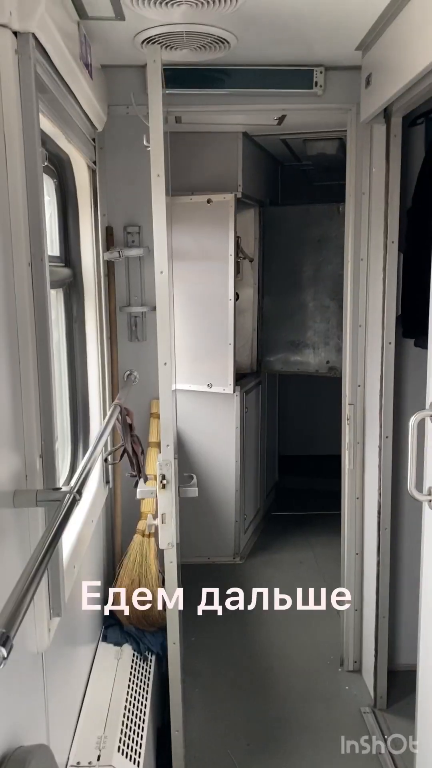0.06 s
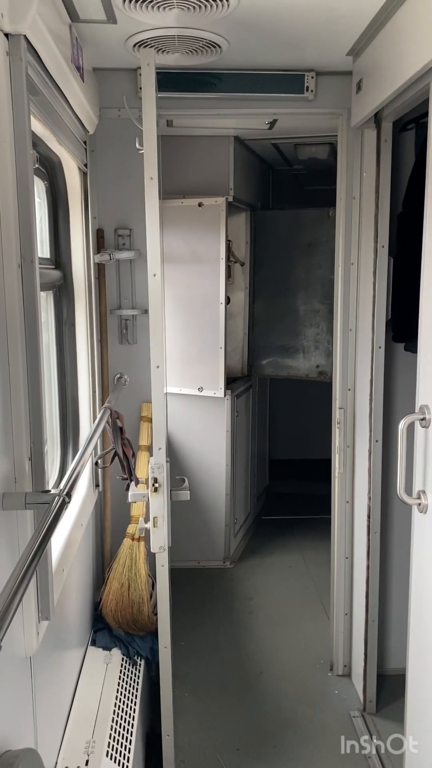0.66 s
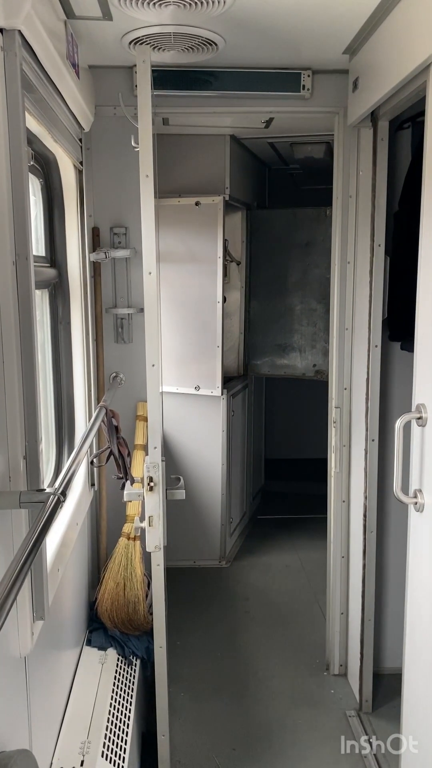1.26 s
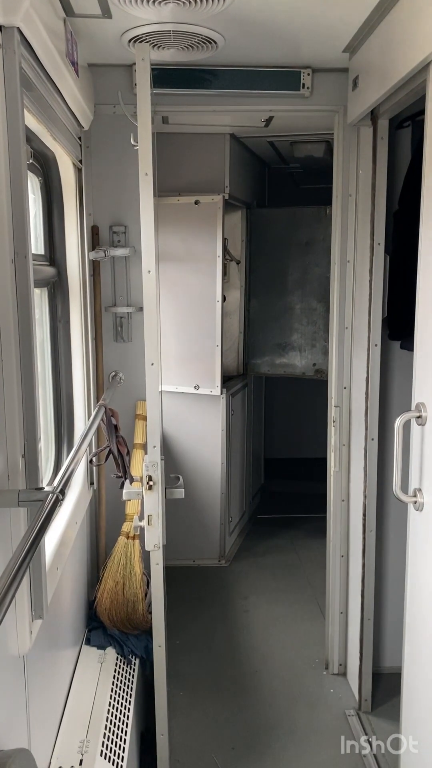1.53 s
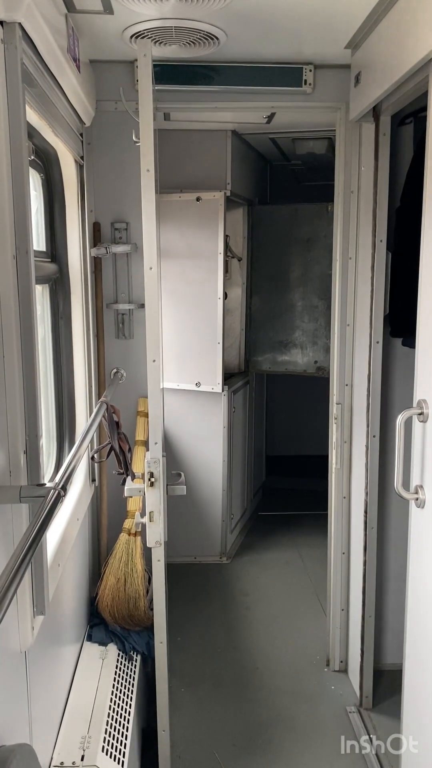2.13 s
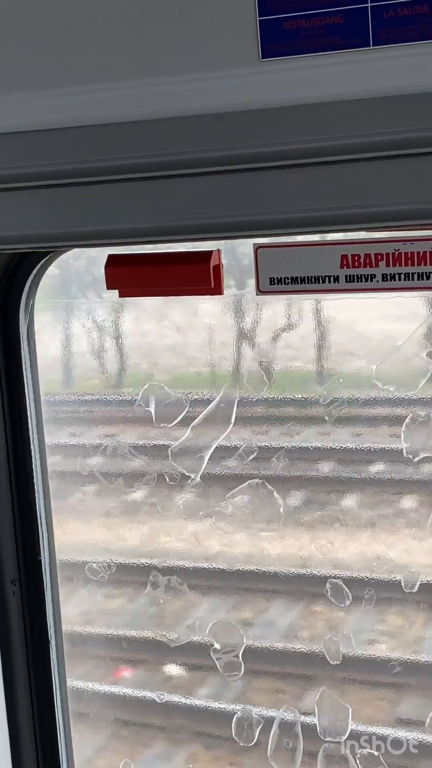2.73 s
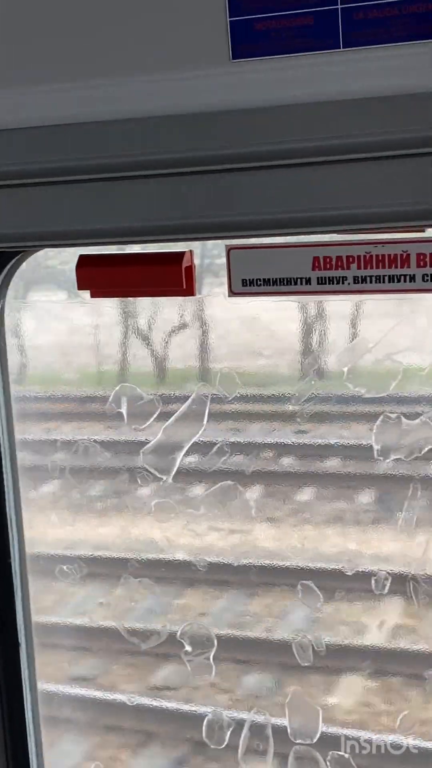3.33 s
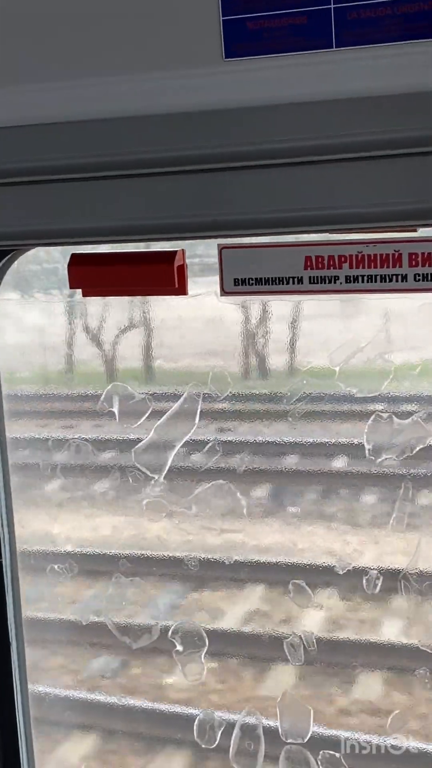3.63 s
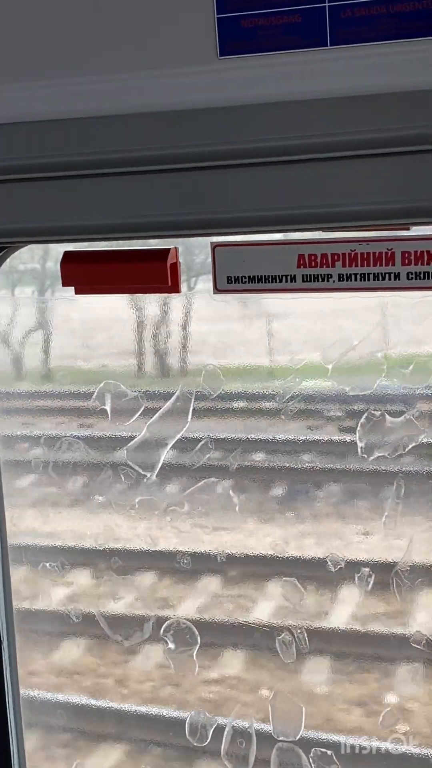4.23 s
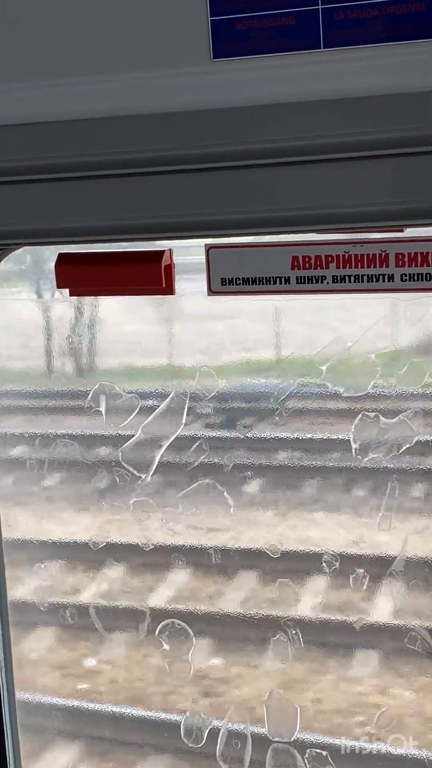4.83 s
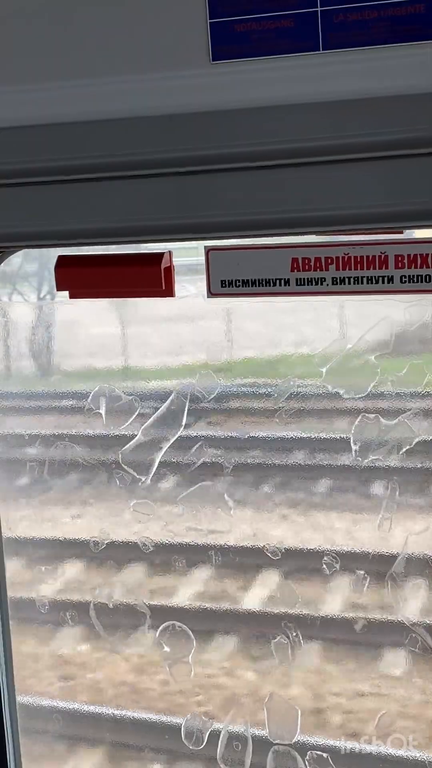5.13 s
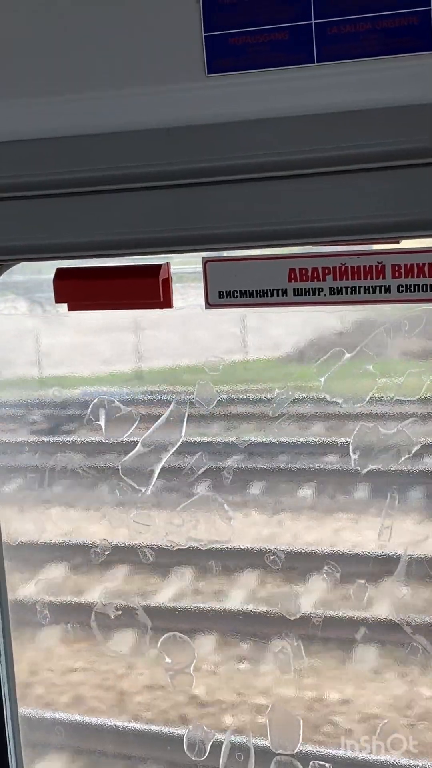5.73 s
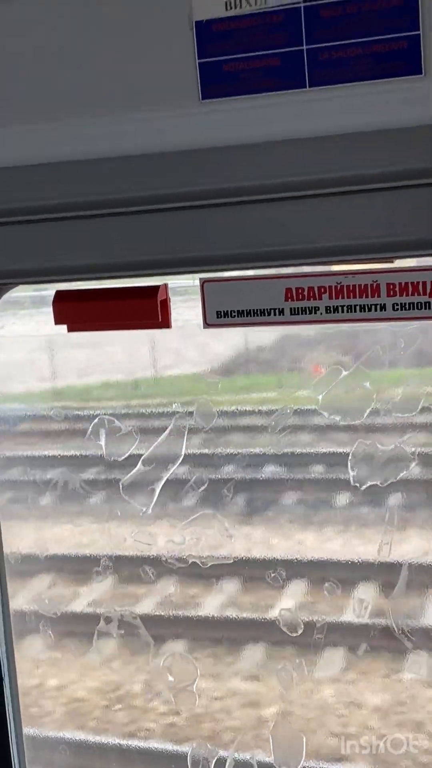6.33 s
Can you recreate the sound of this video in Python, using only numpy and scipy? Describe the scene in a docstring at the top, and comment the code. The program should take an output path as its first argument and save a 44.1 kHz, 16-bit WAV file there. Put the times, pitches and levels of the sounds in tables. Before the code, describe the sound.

Heard from inside a passenger train, in the corridor above the wheels, the carriage gives a loud, deep rumble with a wheel roar and a faint electrical hum. Small metal fittings clink and loose trim rattles. After about two seconds the sound cuts abruptly to a quieter, muffled rumble at a window seat, with a low steady hum, scattered clacks and knocks, and faint cloth rustling near the microphone.

```python
"""Railway carriage, corridor and window seat

A stereo microphone rides at the end of the corridor, over the bogie, then abruptly at a quieter seat.
Rough rails make the car body boom and the wheels roar; electrical machines hum, and a grazing wheel
sings faintly, very high up. Jolted fittings clink, clack and knock, shaken panels drone, trim rattles,
and cloth rustles close to the microphone."""
import sys
import numpy as np
from scipy.fft import rfft, irfft, next_fast_len
from scipy.io import wavfile
from scipy.ndimage import uniform_filter1d, map_coordinates

SR = 44100
rng = np.random.default_rng(int(sys.argv[2]) if len(sys.argv) > 2 else 0)


def to_wav(sig):
    """Store sig (one row per channel, or 1-D mono) as 16-bit WAV at the path in sys.argv[1].

    Samples outside -1..1 are clipped; the rate is SR.
    """
    pcm = np.clip(np.atleast_2d(sig), -1, 1) * 32767
    pcm = np.round(pcm).astype(np.int16)
    wavfile.write(sys.argv[1], SR, pcm.T)  # frames by channels


N = 280467
TIME = np.arange(N) / SR


def amp(db):
    """Decibels to gain."""
    return 10 ** (np.asarray(db) / 20)


def unit(x):
    """Scale to rms 1."""
    return x / np.sqrt(np.mean(x ** 2) + 1e-20)


def along(points, hz):
    """Read (f/Hz, value) points on a log frequency axis."""
    f, v = np.transpose(points)
    return np.interp(np.log(hz + 1), np.log(f + 1), v)


def wobble(rate, count=N):
    """A smooth random curve of count samples, rate knots a second."""
    return map_coordinates(rng.standard_normal(int(count * rate / SR) + 4), [TIME[:count] * rate])


def tone(hz):
    """A sine that follows one frequency per sample."""
    return np.sin(2 * np.pi * np.cumsum(hz) / SR)


def filtered(x, response):
    """Filter x by a function of frequency."""
    m = next_fast_len(x.shape[-1] + SR // 4)
    return irfft(rfft(x, m) * response(np.fft.rfftfreq(m, 1 / SR)), m)[..., :x.shape[-1]]


def resonances(modes, f):
    """The response of (f/Hz, width/Hz, level/dB) modes of alternating sign."""
    return sum((-1) ** k * amp(db) * 1j * f * width / (hz * hz - f * f + 1j * f * width)
               for k, (hz, width, db) in enumerate(modes))


def swells(rows, attack_s, release_db_per_s):
    """The joint gain of (t/s, length/s, level/dB) events that swell, hold and die away."""
    power = 0
    for s, length, db in rows:
        attack = np.clip((TIME - s) / attack_s, 0, 1)
        fall_db = release_db_per_s * np.maximum(TIME - s - length, 0)
        power += (attack * amp(db - fall_db)) ** 2
    return np.sqrt(power)


def sustained(x, span_s):
    """Even out the swells slower than span_s, keeping the fast beating."""
    power = np.abs(uniform_filter1d(np.mean(x ** 2, axis=0), int(span_s * SR) + 1))
    return unit(x / np.sqrt(uniform_filter1d(power, SR // 20) + 1e-6))


# stereo width at the microphone: f/Hz, side minus mid/dB
STEREO_WIDTH = [(70, -43.5), (200, -27.5), (350, -17.5), (650, -6.5), (1400, -11.5), (3000, -9),
                (10000, -24)]
def at_microphone(pair, response):
    """Two noises, filtered, become left and right at rms 1: long waves reach both ports alike."""
    coloured = filtered(pair, response)
    mid, side = filtered(coloured, lambda hz: np.array([np.ones_like(hz), amp(along(STEREO_WIDTH, hz))]))
    return unit(np.array([mid + side, mid - side]))


def rush(spectrum, grain_db=0):
    """Stereo noise, ending an octave above its last point; grain_db clumps it into millisecond grains."""
    force = rng.standard_normal((2, N)) * amp(grain_db * wobble(700))
    return at_microphone(force, lambda hz: amp(along(spectrum, hz)) * (hz < 2 * spectrum[-1][0]))


# a wheel below the corridor: centre t/s, half length/s, f/Hz, level/dB
WHEEL_NOTES = [(0.363, 0.033, 14670, -61), (0.705, .025, 14900, -71), (2.197, 0.11, 14800, -65),
               (2.263, 0.067, 14170, -62)]
def wheel_singing(wander_hz=110, flutter_db=4):
    """A flange grazes the rail and a high wheel mode swells for a moment, catching and slipping."""
    out = np.zeros(N)
    for s, half_length, hz, db in WHEEL_NOTES:
        note = unit(tone(hz + wander_hz * wobble(600)) * amp(flutter_db * wobble(90)))
        out += amp(db) * np.exp(-((TIME - s) / half_length) ** 2) * note
    return out


# cloth close to the microphone, spectrum before the tilt: f/Hz, relative level/dB
CLOTH_SPECTRUM = [(600, -16), (1800, 1.5), (5500, 1.5), (8000, -5.5), (11500, -2.5), (15500, -6)]
# its strokes: t/s, length/s, level/dB
CLOTH_STROKES = [(-0.06, .42, -65.5), (0.49, 0.088, -68), (0.955, 0.09, -61), (1.305, 0.21, -67.5),
                 (1.69, 0.24, -68), (2.08, 0.17, -56.5), (2.29, .1, -62), (2.46, .08, -74), (2.97, .2, -80),
                 (3.345, 0.11, -64), (3.43, 0.13, -59.5), (3.97, 0.071, -66), (4.18, 0.3, -65),
                 (4.63, 0.11, -66.5), (5.05, .08, -71.5), (5.13, 0.074, -65), (5.29, 0.058, -67),
                 (5.63, .11, -75.5), (5.95, 0.48, -68)]
def cloth_rustle(rest_db, grain_db, tilt_db_per_octave, uneven_db):
    """Cloth rustles in strokes of dense tiny grains; the tilt sets its brightness."""
    gain = np.hypot(amp(rest_db), swells(CLOTH_STROKES, attack_s=0.055, release_db_per_s=116))
    colour = [(hz, db + tilt_db_per_octave * np.log2(hz)) for hz, db in CLOTH_SPECTRUM]
    return gain * amp(uneven_db * wobble(22)) * rush(colour, grain_db)


# fits of rattling in the loose trim: t/s, length/s, level/dB
RATTLE_FITS = [(-0.02, 0.037, -53), (.84, 0.11, -61), (.99, 0.056, -56), (1.275, 0.019, -62),
               (1.33, 0.16, -57.5), (1.64, .28, -61), (2.12, 0.16, -58.5), (2.5, 0.32, -72.5),
               (2.76, 0.41, -74), (3.6, 0.15, -70), (4.2, 0.21, -70.5), (5.16, 0.036, -64),
               (5.37, 0.11, -70.5), (5.96, 0.265, -67)]
# its modes: f/Hz, width/Hz, relative level/dB
LOOSE_TRIM_MODES = [(1560, 260, -0.5), (2320, 180, 1.5), (2732, 100, 1), (3400, 130, -3.5),
                    (4330, 180, -11)]
def trim_rattle(chatter_db=3.0):
    """Loose trim chatters against its frame in fits, each contact ringing its modes."""
    contacts = rng.standard_normal((2, N)) * amp(chatter_db * wobble(130))
    ring = at_microphone(contacts, lambda f: resonances(LOOSE_TRIM_MODES, f))
    return swells(RATTLE_FITS, attack_s=0.037, release_db_per_s=173.5) * ring


def machine_hum(lines, waver_db, wander_rate=18):
    """Machine tones wander in pitch and flutter in strength as the car shakes."""
    return sum(amp(db) * unit(tone(hz + wander_hz * wobble(wander_rate)) * amp(waver_db * wobble(20)))
               for hz, db, wander_hz in lines)


# panels and strips of trim that catch the vibration: t/s, length/s, f/Hz, level/dB
PANEL_NOTES = [(0.206, 0.2, 402.8, -43.5), (0.854, 0.14, 259.6, -37), (1.64, 0.088, 2290, -63),
               (2.776, 0.4, 3500, -79), (5.937, 0.1, 168.6, -38.5)]
def panel_drones(flutter_db=3, rough=0.024):
    """A shaken panel swells on one of its modes and dies away; chafing roughens its pitch."""
    out = np.zeros(N)
    for s, length, hz, db in PANEL_NOTES:
        note = unit(tone(hz * (1 + rough * wobble(300))) * amp(flutter_db * wobble(45)))
        out += swells([(s, length, db)], attack_s=0.033, release_db_per_s=220.5) * note
    return out


# the body of a loose fitting: f/Hz, width/Hz, relative level/dB
FITTING_MODES = [(760, 270, 8), (1440, 290, 4.5), (2120, 410, 4), (3080, 800, 1), (4230, 1400, 0.5),
                 (5800, 1600, -1), (11000, 3600, -4)]
def jolt(s, db, pitch_hz, t60, ring_db, bright_db, octaves, rise_s, chatter_db=1.5, rough=0.012):
    """A jolt makes a fitting chatter and ring; bright_db lifts its treble."""
    def response(f):
        band = (1 + (np.log2((f + 1) / pitch_hz) / octaves) ** 4) ** -.5
        treble_lift = 1 + amp(bright_db) * f / FITTING_MODES[-1][0]
        return resonances(FITTING_MODES, f) * band * treble_lift

    out, t = np.zeros((2, N + SR)), np.arange(SR // 2) / SR
    buzz = at_microphone(rng.standard_normal((2, len(t))), response)
    chatter = wobble(400, count=len(t))
    ring = unit(tone(pitch_hz * (1 + rough * chatter)))
    direct = unit(buzz * amp(chatter_db * chatter) + amp(ring_db) * ring) * amp(-60 * t / t60)
    tail = buzz * amp(-24 - 60 * t / 0.8)  # the compartment's weak, diffuse tail, t60 0.8 s
    attack = 1 - np.exp(-t / rise_s)
    out[:, round(s * SR):][:, :len(t)] += .5 * amp(db) * (direct + tail) * attack
    return out[:, :N]


# small metal parts in the carriage: t/s, level/dB, f/Hz, ring against chatter/dB
METAL_CLINKS = [(.008, -43.5, 4380, -6.5), (.155, -52.5, 5030, -5), (0.921, -42.5, 2750, -3),
                (1.183, -47, 2715, -0.5), (1.797, -48, 2750, 2), (1.889, -48.5, 2720, 0),
                (2.124, -38, 2770, -2.5), (3.576, -43, 3330, 1.5)]
def clinks():
    """Small metal parts are jolted and ring clearly."""
    return sum(jolt(s, db, hz, t60=0.12, ring_db=ring_db, bright_db=-4, octaves=0.86, rise_s=0.0017)
               for s, db, hz, ring_db in METAL_CLINKS)


# the metal of a clacking fitting: multiple of the lowest mode, relative level/dB
METAL_MODES = [(1, -2), (1.43, -6), (1.88, -8.5), (2.17, -10.5)]
def clack_ring(s, db, lowest_hz, t60=0.11, rough=0.025):
    """A clack leaves its fitting ringing, hollow and a little rough as it settles."""
    out, t = np.zeros(N + SR), np.arange(SR // 2) / SR
    for multiple, mode_db in METAL_MODES:
        mode = tone(lowest_hz * multiple * (1 + rough * wobble(500, count=len(t))))
        out[round(s * SR):][:len(t)] += amp(db + mode_db - 60 * t / t60) * mode
    return out[:N]


# loose fittings heard from the seat: t/s, level/dB, chatter f/Hz, brightness/dB, lowest mode f/Hz
FITTING_CLACKS = [(2.42, -50.5, 2310, 0.5, 1630), (2.699, -40.5, 3170, 11, 1790),
                  (3.981, -42.5, 4640, 2, 3410), (4.658, -51.5, 4600, 8.5, 3200),
                  (5.178, -47.5, 2900, 2.5, 2410), (5.318, -46, 3300, 22, 1453),
                  (5.546, -54.5, 2350, 10, 2150), (5.838, -40.5, 3430, -7, 3290)]
def clacks(touch_lead_s=0.019, touch_db=-15.5, metal_db=-7.5):
    """A loose fitting touches lightly, then strikes hard, and its metal rings."""
    touches = [(s - touch_lead_s, db + touch_db, *colour) for s, db, *colour in FITTING_CLACKS]
    contacts = sum(jolt(s, db, hz, t60=0.093, ring_db=-15, bright_db=bright, octaves=1, rise_s=0.0025)
                   for s, db, hz, bright, _ in FITTING_CLACKS + touches)
    rings = sum(clack_ring(s, db + metal_db, lowest_hz) for s, db, _, _, lowest_hz in FITTING_CLACKS)
    return contacts + rings


# knocks in the panelling: t/s, level/dB, f/Hz, t60/s
PANEL_KNOCKS = [(.842, -35.5, 710, 0.18), (2.785, -50, 716, 0.46), (3.09, -52.5, 1740, 0.093),
                (4.031, -39, 1033, 0.1), (4.445, -49.5, 1310, 0.16), (4.822, -45.5, 827, 0.31),
                (5.056, -39.5, 1050, 0.031), (5.077, -43, 850, 0.073), (5.405, -50, 600, 0.15)]
def knocks(wall_hz=525, wall_db=-6):
    """The panelling knocks, low and soft, and the wall behind it thuds."""
    panels = sum(jolt(s, db, hz, t60, ring_db=-7, bright_db=-9, octaves=0.71, rise_s=0.0046)
                 for s, db, hz, t60 in PANEL_KNOCKS)
    wall = sum(jolt(s, db + wall_db, wall_hz, t60, ring_db=-6.5, bright_db=-19, octaves=0.099,
                    rise_s=0.0027) for s, db, _, t60 in PANEL_KNOCKS)
    return panels + wall


# brief swells of the low rumble: t/s, swell/dB
BOOM_SWELLS = [(0.16, 3.5), (0.79, 2.5), (1.22, 6.5), (2.18, 6), (4.42, 8), (5.12, 5), (6.01, 6),
               (6.16, 6.5)]
def boom_swell(half_length_s=0.034):
    """The rise in dB as the low rumble briefly swells."""
    return sum(db * np.exp(-((TIME - s) / half_length_s) ** 2) for s, db in BOOM_SWELLS)


# thin trim that trembles with the ride: f/Hz, width/Hz, relative level/dB
THIN_TRIM_MODES = [(1680, 310, 0.5), (2130, 140, 3), (2340, 59, 2.5), (2710, 37, -2.5), (3510, 67, -6)]
def rolling(ride, boom, panels, roar, shell_db, panel_db, trim_db, sway_db, flutter_db, tremble_db):
    """Rough rails shake the shell, the panels and the trim; the wheels' roar flutters as they turn."""
    times, boom_levels, roar_levels = np.transpose(ride)
    boom_db = np.interp(TIME, times, boom_levels)
    roar_db = np.interp(TIME, times, roar_levels)
    swell_db = boom_swell()
    shake_db = 0.39 * (roar_db - np.mean(roar_levels)) + 0.1 * swell_db  # the panels partly follow both
    shell = amp(boom_db + shell_db + swell_db + sway_db * wobble(6.6)) * sustained(rush(boom), 0.22)
    walls = amp(panel_db + shake_db) * sustained(rush(panels), span_s=0.2)
    wheels = amp(roar_db + flutter_db * wobble(25)) * rush(roar)
    trim = at_microphone(rng.standard_normal((2, N)), lambda f: resonances(THIN_TRIM_MODES, f))
    return shell + walls + wheels + amp(roar_db + trim_db + tremble_db * wobble(16)) * trim


# the ride at the window seat: t/s, boom level/dB, roar level/dB
WINDOW_RIDE = [(2.35, -34.5, -60), (2.6, -30.5, -65.5), (3.3, -32, -66.5), (3.64, -32.5, -61),
               (4.44, -34, -58.5), (4.6, -33.5, -63.5), (4.98, -33.5, -65), (5.42, -34, -64.5),
               (5.66, -34.5, -68), (5.92, -32, -62.5), (6.36, -35.5, -66)]
# spectra there of floor and shell, wall panels, and wheels on rails: f/Hz, relative level/dB
WINDOW_SHELL = [(20, -47), (27, -23), (35, -6.5), (48, -11.5), (62, -5.5), (73, 2), (98, -10), (112, -6.5),
                (130, -21.5), (200, -73)]
WINDOW_PANELS = [(80, -40.5), (120, -2.5), (168, 0), (192, -5.5), (250, -6), (283, -2.5), (314, -12),
                 (334, -2), (347, -1), (356, -12.5), (420, -19.5), (620, -60)]
WINDOW_WHEELS = [(250, -42), (450, 1.5), (720, -2.5), (1100, -10), (1700, -17), (2300, -19), (3200, -23),
                 (6000, -33), (15000, -49)]
# the generator: f/Hz, level/dB, wander/Hz
WINDOW_HUM = [(57.3, -38.5, 0.75), (168.5, -51.5, 2.085), (345.8, -54, 4.2)]
def window_seat():
    """Microphone behind the closed window: the roar is muffled; a generator drones under the floor."""
    ride = rolling(WINDOW_RIDE, WINDOW_SHELL, WINDOW_PANELS, WINDOW_WHEELS,
                   shell_db=-1.5, panel_db=-44, trim_db=-14.5, sway_db=0.9, flutter_db=2, tremble_db=5)
    hum = machine_hum(WINDOW_HUM, waver_db=1.8)
    cloth = amp(1.46) * cloth_rustle(rest_db=-81.5, grain_db=1.5, tilt_db_per_octave=-1.05, uneven_db=1.44)
    return ride + hum + cloth


# the ride over the bogie: t/s, boom level/dB, roar level/dB
BOGIE_RIDE = [(0.0, -17, -44), (0.18, -20.5, -48), (0.3, -21, -46), (0.6, -18.5, -47), (1.62, -18.5, -48),
              (1.8, -26.5, -46.5), (1.9, -17.5, -45), (2.34, -17, -41)]
# spectra there of floor and shell, wall panels, and wheels on rails: f/Hz, relative level/dB
BOGIE_SHELL = [(20, -50), (27, -23.5), (38, -5), (52, -16), (63, 1.5), (69, -4), (76, 2), (86, -14.5),
               (110, -8.5), (135, -34.5), (200, -69)]
BOGIE_PANELS = [(80, -47.5), (120, 1), (170, -1), (220, -11.5), (255, -6.5), (305, -18.5), (410, -19),
                (470, -30), (650, -66)]
BOGIE_WHEELS = [(250, -41.5), (450, 3.5), (660, 2), (740, -6), (950, -7), (1200, -10.5), (2000, -18),
                (2700, -23.5), (3400, -31.5), (6000, -35.5), (15000, -70.5)]
# electrical machines: f/Hz, level/dB, wander/Hz
BOGIE_HUM = [(410.7, -54.5, 4), (671, -51.5, 7), (781, -57, 2.5)]
def corridor():
    """End of the corridor, over the bogie, with little between the wheels and the microphone."""
    ride = rolling(BOGIE_RIDE, BOGIE_SHELL, BOGIE_PANELS, BOGIE_WHEELS,
                   shell_db=0, panel_db=-29, trim_db=-20.5, sway_db=-1, flutter_db=1.4, tremble_db=5.5)
    hum = machine_hum(BOGIE_HUM, waver_db=1.5, wander_rate=50)
    cloth = cloth_rustle(rest_db=-73, grain_db=1, tilt_db_per_octave=-2, uneven_db=0.8)
    return ride + hum + cloth + wheel_singing()


def scene(move_s=2.342, fade_s=0.0016, click_db=-23, click_decay_s=0.00004):
    """The corridor gives way abruptly to the window seat, with a small click."""
    seated = np.clip((TIME - move_s) / fade_s + .5, 0, 1)
    click = amp(click_db) * (TIME >= move_s) * np.exp(-np.abs(TIME - move_s) / click_decay_s)
    carriage = (1 - seated) * corridor() + seated * window_seat()
    return carriage + clinks() + clacks() + knocks() + panel_drones() + trim_rattle() + click


# phase between the microphone's two ports: f/Hz, lead of the left/rad
LEFT_LEAD = [(300, 0), (5200, .5), (6200, 1.99), (7200, 2), (9000, 5.5), (12000, 8), (15700, 11.5)]
def record(dry, top_hz=15780):
    """The microphone's ports drift apart in phase in the treble; nothing passes above top_hz."""
    sides = np.array([[1], [-1]])
    return filtered(dry, lambda hz: np.exp(.5j * along(LEFT_LEAD, hz) * sides) * (hz < top_hz))


dry = scene()
out = record(dry)
to_wav(out)
```